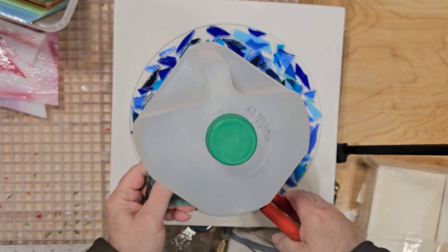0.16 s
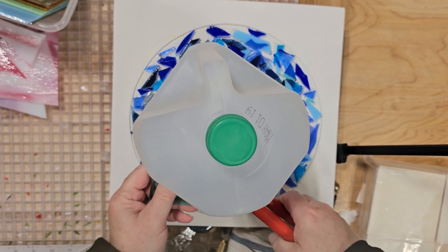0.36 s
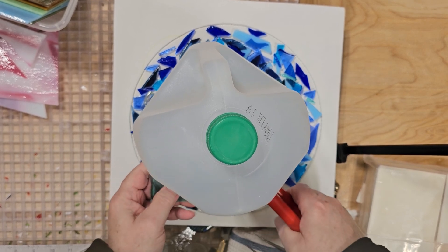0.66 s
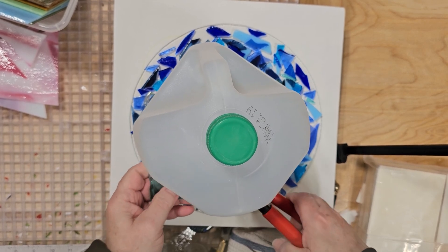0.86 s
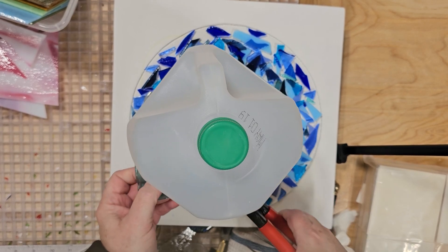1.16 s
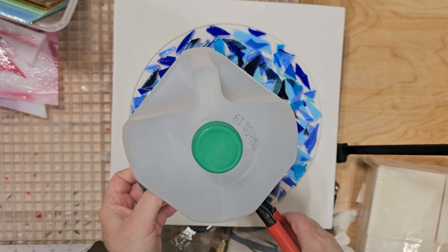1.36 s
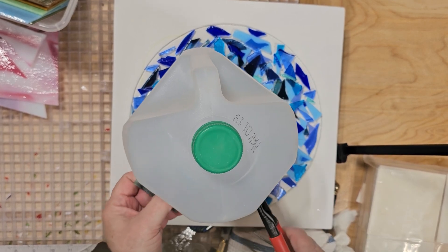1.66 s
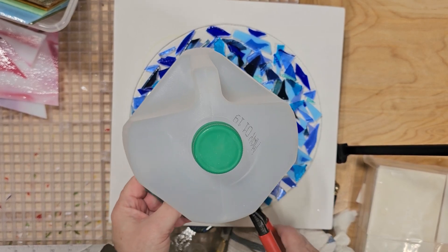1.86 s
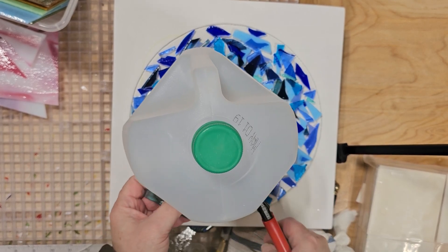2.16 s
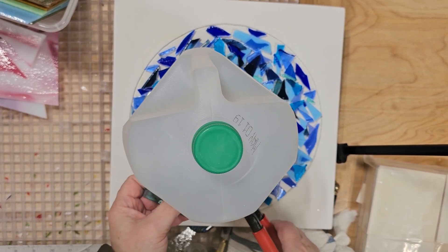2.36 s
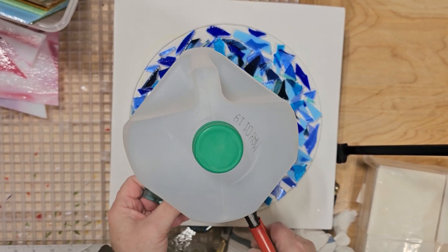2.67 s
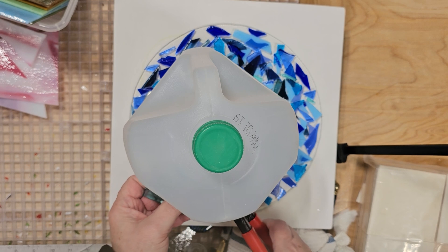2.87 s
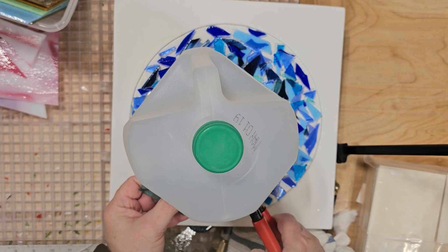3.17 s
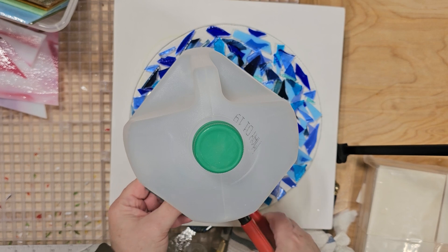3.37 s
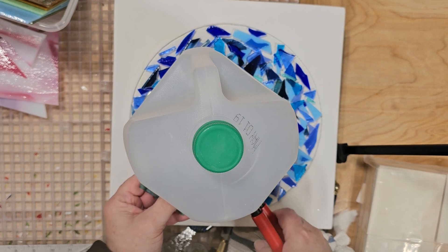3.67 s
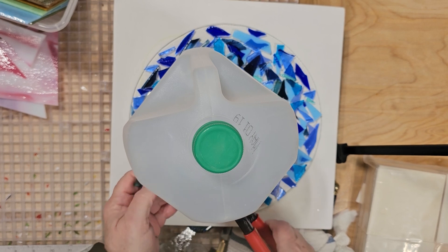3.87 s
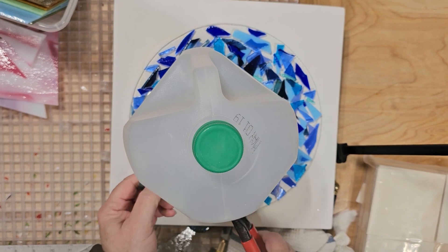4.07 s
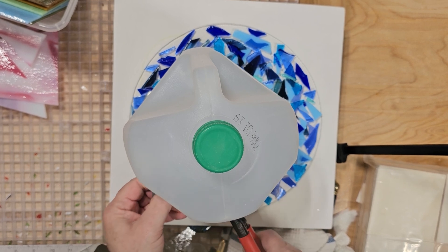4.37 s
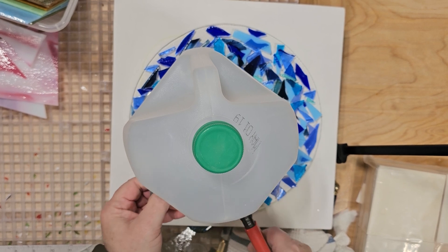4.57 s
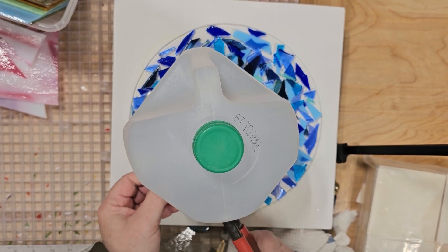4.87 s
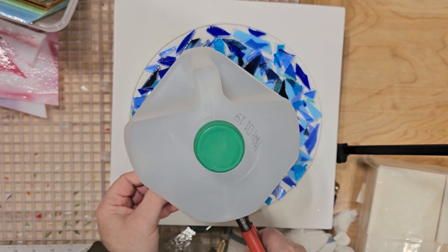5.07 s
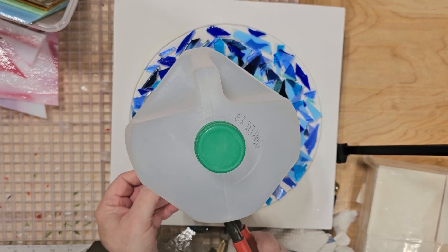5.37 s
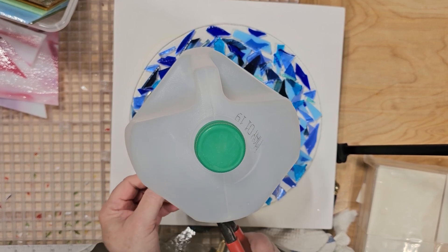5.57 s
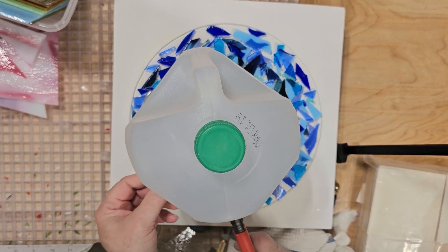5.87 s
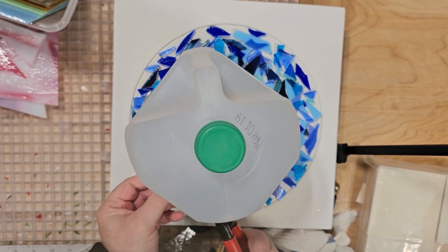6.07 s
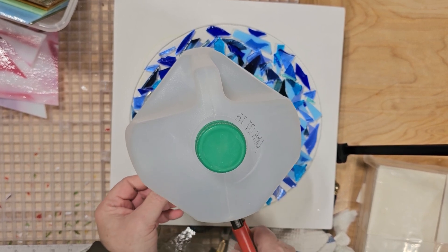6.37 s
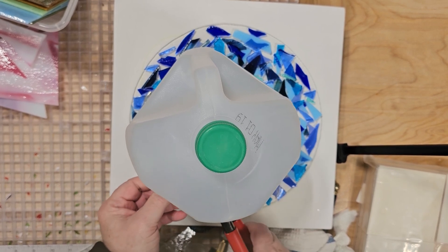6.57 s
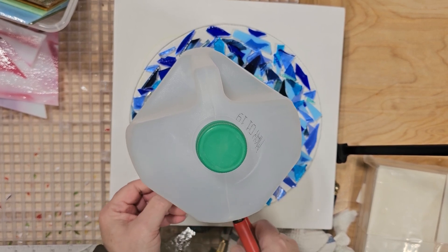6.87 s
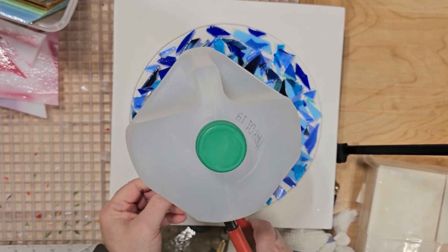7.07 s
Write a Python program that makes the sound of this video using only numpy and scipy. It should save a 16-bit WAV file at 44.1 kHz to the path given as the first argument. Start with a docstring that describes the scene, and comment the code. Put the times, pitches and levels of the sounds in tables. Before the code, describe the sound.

Close up in a small workroom, glass crackles and snaps between the jaws of hand nippers, over and over, a little under a second apart for most of the time. The cutting happens inside a plastic jug, so flying pieces tap its walls with hollow knocks and crumbs slide about between the crisp breaks. A faint hum lies underneath.

```python
"""Glass crunches and snaps between hand nippers, inside an upturned plastic jug on a workshop table.
Each brittle fracture radiates a noise burst and sets a shard ringing. Flying shards strike the jug and
bounce: the wall knocks in its bending modes and the enclosed air booms in its cavity modes.
A small room reverberates over a low hum, and a phone with two microphone ports picks it all up."""
import sys
import numpy as np
from scipy import signal
from scipy.fft import rfft, irfft, next_fast_len
from scipy.io import wavfile
from scipy.ndimage import uniform_filter1d

SR = 44100
rng = np.random.default_rng(int(sys.argv[2]) if len(sys.argv) > 2 else 0)


def pcm_store(signal):
    """Save signal as 16-bit PCM."""
    levels = np.round(np.clip(np.atleast_2d(signal), -1, 1) * 32767)
    wavfile.write(sys.argv[1], SR, levels.astype(np.int16).T)


N = 317961
SIZE = next_fast_len(N + SR)
HZ = np.maximum(np.arange(SIZE // 2 + 1) * SR / SIZE, 1)
TIME, SPAN = np.arange(N) / SR, np.arange(8192) / SR  # seconds: whole scene, one event

# Modes of the thin jug wall. Each row: frequency in Hz, relative level in dB, T60 in seconds.
WALL_MODES = [(738, -10, 0.018), (837, -14, 0.036), (1013, -4, 0.034), (1155, 0.5, 0.016),
              (1284.6, 2.5, 0.018), (1453, 0, 0.019), (1628, 2, 0.015), (1847, 1.5, 0.011),
              (2013, 0, 0.0097), (2140, -8, 0.033)]
# Upper modes of the air in the jug. Each row: frequency in Hz, relative level in dB, T60 in seconds.
HIGH_AIR_MODES = [(428, -13.5, 0.15), (534.8, 14.5, 0.07), (605, -11.5, .08), (631.7, 3, 0.086)]
# Spectrum of glass hitting plastic. Each row: frequency in Hz, relative density in dB.
CLICK_SPECTRUM = [(1350, -18.5), (2300, -4), (4620, -2), (5750, -7.5), (8160, -3), (10400, -16),
                  (11700, -16), (16000, -20)]


def glass_fracture():
    """Brittle fracture: stored strain energy escapes as a burst that excites shard, jaws and jug wall."""
    # Crunches as the jaws close. Each row: start in seconds, level in dB, shard pitch in Hz.
    cracks = [(0.4222, -20, 6430), (0.488, -19.5, 7100), (.492, -12, 7600), (0.5095, -14.5, 8500),
              (1.087, -39, 2900), (1.13, -38, 4640), (1.163, -25.5, 7430), (1.17, -23.5, 6630),
              (1.209, -25.5, 11600), (1.363, -35.5, 7600), (1.945, -35, 6860), (2.0425, -44, 4540),
              (2.058, -40, 7150), (2.1036, -22, 5630), (2.1168, -4, 9180), (2.4655, -19.5, 7580),
              (2.4803, -22.5, 8700), (2.5352, -11.5, 7700), (2.562, -22, 8420), (2.5684, -7.5, 8350),
              (2.573, -11, 7410), (2.5917, 2, 8700), (2.9762, -13, 11500), (2.994, -14.5, 2880),
              (3.0013, -11, 7500), (3.0267, -10.5, 8250), (3.4555, -20.5, 8000), (3.475, -19.5, 8450),
              (3.498, -38, 8800), (4.1891, -23, 4460), (4.253, -45, 7000), (4.358, -18, 11150),
              (4.3943, -29, 6630), (4.428, -27, 8500), (4.4565, -13, 8600), (4.914, -40.5, 6440),
              (4.9627, -25, 8300), (5.012, -31, 10300), (5.0399, -12.5, 8200), (5.052, -10.5, 3030),
              (5.65, -28, 5960), (5.674, -27.5, 4280), (5.713, -17.5, 10100), (6.1927, -18.5, 8400),
              (6.214, -20.5, 9500), (6.2269, -20, 8400), (6.2424, -19, 7200), (6.2657, -14, 4500),
              (6.2856, -40, 7900), (6.2967, -20, 7900), (6.763, -22.5, 7650), (6.788, -17, 7800),
              (6.801, -14.5, 7900), (6.816, -15, 7400), (6.8324, -37, 7950), (6.85, -6, 6280)]
    # The glass parts. Each row: start in seconds, level in dB, shard pitch in Hz,
    # length of the grinding before it in ms, grinding level in dB.
    snaps = [(0.521, 0.5, 8460, 35, -25), (2.1059, -1.5, 5500, 3, -29.5), (2.5923, -1.5, 8470, 35, -29),
             (3.0186, 0.5, 5990, 53, -33), (3.5185, 0.5, 6750, 33, -36.5), (4.4767, 0.5, 5780, 49, -20.5),
             (5.0542, -1, 8060, 50, -28), (5.7371, -2, 6540, 26, -21.5), (6.3042, -.5, 7720, 20, -32),
             (6.8521, -1, 8000, 83, -28)]
    # Spectrum of breaking glass. Each row: frequency in Hz, relative density in dB.
    spectrum = [(700, -40), (1700, -21.5), (2400, -14.5), (3000, -13), (4300, -11.5), (5700, -5),
                (8200, -1.5), (9400, -3.5), (10400, -14.5), (11700, -7.5), (16000, -12)]
    breaks = [(s, db, hz, 4.1) for s, db, hz in cracks]
    breaks += [(s, db, hz, 3.23) for s, db, hz, *_ in snaps]
    breaks += [(s + 0.0045, db - 3, 8330, 4.1) for s, db, *_ in snaps]  # the freed edge cracks again
    crackle, clink, clack = np.zeros((3, 2, N))
    for s, db, hz, decay_ms in breaks:
        burst = rattle(decay_ms, blow_db=-4)
        grit = amp(-14) * rattle(12.7, blow_db=-32.5)
        add(crackle, s, amp(db) * (burst + grit))
        jaw_gain = amp(rng.normal(-11, 3))
        steel_jaws = jaw_gain * ping(hz=rng.normal(2950, 200), t60=.008)
        add(clink, s, amp(db) * (ping(hz, t60=.013) + steel_jaws))
        add(clack, s, amp(-38.5 + 0.75 * db) * rattle(decay_ms))  # each crack also knocks the jug wall into a brief clack
    crackle += grinding(snaps)
    return (amp(-6) * colour(crackle, unit(amp(over_hz(spectrum))))
            + amp(-1.5) * colour(clink, low_cut(hz=2500)) + amp(4.5) * ring(clack, WALL_MODES))


def grinding(snaps):
    """Friction: the cutting wheels crush grit just before each snap."""
    spells = [(s - ms / 1000, s, db, db) for s, _, _, ms, db in snaps]
    opening_sizzle = (-4, 0.13, -23, -40)  # grit of an earlier snap dies away
    return colour(grains(spells + [opening_sizzle], lump_db=3.5, rate_hz=450), low_cut(hz=5000))


def ringing_shard():
    """Free vibration: a stiff shard rings on in one high, lightly damped mode."""
    # Each row: start in seconds, frequency in Hz, level in dB, T60 in seconds.
    notes = [(3.022, 15014, -13, .14), (3.327, 15014, -32, .1)]
    sound = np.zeros(N)
    for s, hz, db, t60 in notes:
        age = np.maximum(TIME - s, 0)
        envelope = (1 - np.exp(-age / 0.002)) * 1000. ** (-age / t60)
        sound += amp(db) * envelope * np.sin(2 * np.pi * hz * TIME)
    return sound


def jug_knocks(contact_ms=9):
    """Impact excitation: a shard clicks on the wall, which rings and drives the cavity modes."""
    # Each row: start in seconds, then levels in dB of click, wall, deep boom and high boom.
    knocks = [(0.0298, -19.5, -25, -24.5, -24), (0.1094, -43, -40, -45, -28.5),
              (0.191, -10, -14.5, -46, -45), (.2004, -13, -28, -39, -32), (0.2743, -18, -25.5, -43, -24),
              (0.3223, -22, -33.5, -58, -36.5), (.63, -12.5, -16.5, -16, -12), (.727, -12.5, -19, -19, -16),
              (.8135, -38, -36, -56, -27), (0.835, -23.5, -34, -40, -27.5), (.864, -18, -26.5, -46, -25),
              (.9453, -32.5, -35, -43, -35), (1.3393, -35, -60, -48.5, -30.5),
              (2.2222, -11, -19.5, -46, -30), (2.2384, -23, -31, -56, -54),
              (2.2732, -30, -32, -56.5, -51.5), (2.3287, -19, -30, -60, -43), (2.396, -31, -36, -58.5, -51),
              (2.408, -28.5, -34.5, -58, -45), (2.4403, -29.5, -36, -62.5, -47.5),
              (2.6836, -9, -14, -21, -10.5), (2.757, -14, -17, -21, -15), (2.807, -15, -18.5, -44, -20),
              (2.8836, -16.5, -20, -51, -25.5), (2.9271, -13, -24.5, -57, -27.5),
              (2.9598, -23, -30.5, -48, -31.5), (3.278, -14, -16.5, -27, -15.5),
              (3.328, -11, -29, -44, -29.5), (3.3939, -29, -42, -44, -59), (3.659, -53, -48, -62, -60),
              (3.702, -13, -18.5, -42, -22.5), (3.7576, -20.5, -32.5, -37, -29),
              (3.8392, -19, -29, -53, -34), (4.6359, -10, -14, -20.5, -19), (4.6974, -17, -27, -29.5, -29),
              (4.726, -36.5, -47, -45.5, -51), (4.776, -19.5, -34, -51, -30), (5.1226, -25, -26, -17, -18),
              (5.1861, -5, -14, -21.5, -24.5), (5.257, -25, -37, -33.5, -39),
              (5.2756, -20.5, -33, -61, -45), (5.3497, -22.5, -30.5, -49, -27.5),
              (5.3913, -26, -37, -48, -51), (5.439, -32.5, -43, -46, -46), (5.8487, -10, -21.5, -30.5, -22),
              (5.9978, -12.5, -18.5, -28.5, -32), (6.071, -25.5, -27.5, -59, -36.5),
              (6.0898, -19, -33, -53, -41), (6.117, -27, -32.5, -40, -37.5), (6.3714, -17.5, -39, -24, -30),
              (6.3904, -11.5, -19, -28, -13.5), (6.4676, -22, -26, -25.5, -33), (6.4777, -9, -19, -33, -21),
              (6.5463, -25, -46, -46, -51), (6.5684, -16.5, -27.5, -53, -26),
              (6.5798, -18, -30.5, -54, -39), (6.604, -27.5, -37, -56, -42.5), (6.7106, -26, -36, -52, -33),
              (6.9129, -11, -21, -19, -23), (6.9231, -10.5, -19, -34, -11), (7.026, -5, -15.5, -36, -28),
              (7.1153, -23, -28.5, -57, -24.5), (7.1434, -24, -36, -48, -50), (7.1872, -29, -37, -53, -50)]
    # Lower modes of the air in the jug. Each row: frequency in Hz, relative level in dB, T60 in seconds.
    deep_air_modes = [(162.5, -10, 0.18), (268, -5, 0.17), (275.8, 1, 0.29), (314.7, -2, 0.21),
                      (334, 0, 0.034)]
    click, jug = np.zeros((2, 2, N))
    for s, click_db, wall_db, deep_db, high_db in knocks:
        add(click, s, amp(click_db) * rattle(contact_ms))
        impact = rattle(1.85 * contact_ms, blow_db=17, correlation=.8)
        add(jug, s, amp(wall_db) * ring(impact, struck(WALL_MODES)))
        # the wall flexes once, then shudders, pushing the air inside
        flex = np.exp(-SPAN / 0.00013) * rng.choice([-1, 1])
        push = flex + amp(-12) * rattle(4.24 * contact_ms, blow_db=-27.5)[:1]
        add(jug, s, amp(deep_db) * ring(push, struck(deep_air_modes)))
        add(jug, s, amp(high_db) * ring(push, struck(HIGH_AIR_MODES)))
    return jug + amp(-3.5) * colour(click, unit(amp(over_hz(CLICK_SPECTRUM))))


def skitter(fade_db_per_s=48.5):
    """Random forcing: sliding crumbs and hands shifting the jug excite its wall and air."""
    # Each row: start in seconds, length in seconds, initial level in dB.
    slides = [(0.002, 0.21, -55), (0.185, 0.15, -34.5), (0.747, 0.25, -30.5), (1.009, .14, -50),
              (1.284, 0.097, -48.5), (2.247, 0.24, -43), (2.69, 0.26, -27), (3.289, 0.085, -28),
              (3.699, 0.18, -36.5), (4.647, 0.16, -31.5), (5.112, 0.31, -27.5), (5.863, 0.48, -51),
              (6.351, 0.4, -32.5), (6.91, 0.5, -40.5)]
    spells = [(s, s + length, db, db - fade_db_per_s * length) for s, length, db in slides]
    patter = grains(spells, lump_db=3, rate_hz=160)
    clicks = amp(-4) * colour(patter, unit(amp(over_hz(CLICK_SPECTRUM))))
    return clicks + amp(-4.5) * ring(patter, WALL_MODES) + amp(-14) * ring(patter[:1], HIGH_AIR_MODES)


def room(x, build_up_s=0.00043):
    """Reverberation: a diffuse field, different at each port, decays exponentially in each octave."""
    # Each row: frequency in Hz, T60 in seconds.
    decay_times = [(200, 0.17), (1000, 0.28), (4000, 0.3), (9000, 0.39), (16000, 0.08)]
    # Each row: frequency in Hz, relative reverberant level in dB.
    levels = [(200, -24.5), (1000, -12), (4000, -10), (9000, -16), (16000, -6)]
    t = np.arange(SR // 2) / SR
    tail = 0
    for hz in 180 * 2. ** np.arange(7):
        octave = signal.butter(2, [hz / np.sqrt(2), hz * np.sqrt(2)], "band", fs=SR, output="sos")
        band = signal.sosfilt(octave, rng.standard_normal((2, len(t))))
        t60 = over_hz(decay_times, hz)
        envelope = 1000. ** (-t / t60) * (1 - np.exp(-t / build_up_s))
        energy_norm = np.sqrt(np.log(1e6) / (t60 * SR))
        tail += band * envelope * energy_norm * amp(over_hz(levels, hz))
    return signal.fftconvolve(x[None], tail, axes=1)[:, :N]


def hum():
    """Spatial coherence: room tone is alike at both ports only in the bass; a deep rumble swells late."""
    # Each row: frequency in Hz, relative density in dB.
    spectrum = [(15, -40.5), (40, -20), (78, -0.5), (120, -14.5), (175, -14.5), (203, -8.5), (235, -14),
                (350, -23), (550, -20.5), (1200, -32.5), (2200, -36), (2900, -50.5), (3900, -42),
                (5200, -51), (7500, -45), (10000, -68), (16000, -89)]
    # Each row: frequency in Hz, correlation between the ports.
    coherence = [(60, .95), (290, .85), (640, .5), (1410, 0)]
    alike = over_hz(coherence)
    noise = rng.standard_normal((3, N))
    mid, side = colour(noise[:2], amp(over_hz(spectrum)) * np.sqrt([1 + alike, 1 - alike]))
    tone = unit(np.array([mid + side, mid - side])) * amp(-51.5 + walk(rate_hz=0.42))
    rumble = unit(colour(noise[2], bell_curve(hz=49, width_hz=39)))
    rumble_db = np.interp(TIME, [4.998, 6.2, 6.6, 7.21], [-63, -52, -43.5, -46.5])
    return tone + rumble * amp(rumble_db)


def rattle(decay_ms, blow_db=6, correlation=0.45):
    """Contact noise: a sharp blow, then tiny dying slips, partly correlated between the ports."""
    near, other = rng.standard_normal((2, len(SPAN)))
    far = correlation * near + np.sqrt(1 - correlation ** 2) * other
    lumps = amp(-2 * np.repeat(rng.standard_normal(len(SPAN) // 64), 64))
    fade = np.exp(-(SPAN * 1000 / decay_ms) ** 1.5)
    blow = amp(blow_db) * np.exp(-SPAN * 1000 / 0.091)
    sound = np.array([near, far]) * (lumps * fade + blow)
    return sound * np.linalg.norm(fade) / np.linalg.norm(sound[0])


def grains(spells, lump_db, rate_hz):
    """Granular noise: countless tiny contacts merge into a lumpy hiss during each spell."""
    level = sum((TIME > start) * (TIME < end) * amp(np.interp(TIME, [start, end], [first_db, last_db]))
                for start, end, first_db, last_db in spells)
    return uniform_filter1d(level, size=60) * amp(lump_db * walk(rate_hz)) * rng.standard_normal((2, N))


def struck(modes):
    """Modal scatter: strike point and grip shift each mode's pitch and strength at random."""
    return [(hz * rng.normal(1, .015), rng.normal(db, 2.5), t60) for hz, db, t60 in modes]


def ring(x, modes):
    """Modal superposition: x drives damped resonators whose joint response has unit energy."""
    response = sum((-1) ** k * amp(db) * ping(hz, max(t60, .01)) for k, (hz, db, t60) in enumerate(modes))
    return signal.fftconvolve(x, response[None] / np.linalg.norm(response), axes=1)[:, :x.shape[1]]


def ping(hz, t60):
    """Damped oscillation: one mode falls 60 dB in t60 seconds."""
    return np.sin(2 * np.pi * hz * SPAN) * np.exp(-np.log(1000) * SPAN / t60)


def walk(rate_hz):
    """Smoothed random fluctuation with RMS 1."""
    hold = int(SR / rate_hz)
    steps = np.repeat(rng.standard_normal(N // hold + 1), hold)
    return unit(uniform_filter1d(uniform_filter1d(steps, hold), hold)[:N])


def add(track, s, sound):
    """Superpose a short sound at s seconds."""
    at = int(s * SR)
    track[..., at:at + len(SPAN)] += sound[..., :N - at]


def amp(db):
    """Decibels to amplitude."""
    return 10 ** (np.asarray(db, float) / 20)


def unit(x):
    """Normalise to RMS 1."""
    return x / np.sqrt(np.mean(x ** 2))


def over_hz(table, hz=HZ):
    """Interpolate on a log-frequency axis."""
    freqs, values = np.transpose(table)
    return np.interp(np.log(hz), np.log(freqs), values)


def colour(x, gain):
    """Linear filtering: one gain per frequency."""
    return irfft(rfft(x, SIZE) * gain, SIZE)[..., :N]


def low_cut(hz):
    """Gain falling 12 dB per octave below hz."""
    return np.minimum(HZ / hz, 1) ** 2


def bell_curve(hz, width_hz):
    """Gaussian band around hz."""
    return np.exp(-((HZ - hz) / width_hz) ** 2)


def scene():
    """Acoustic shadow: the near port faces the jug, and the phone's body screens the far one."""
    # Each row: frequency in Hz, phase lag of the far port in radians.
    phase_lag = [(0, 0), (300, .3), (700, .7), (1550, 1.8), (3010, 1.2), (4500, 3.2), (6800, -.5),
                 (8180, 2.4), (9560, 10.1), (16500, 14)]
    # Each row: frequency in Hz, attenuation of the far port in dB.
    shadow = [(60, 0), (110, 12.5), (200, -3), (380, 5), (700, -1), (1290, 5), (2380, 8.5), (4400, 10.5),
              (8120, 17.5), (15000, 10)]
    near, far = glass_fracture() + ringing_shard() + jug_knocks() + skitter()
    lag = np.interp(HZ, *np.transpose(phase_lag))
    far = colour(far, np.exp(-1j * lag))
    left, right = np.array([near, far]) + room(near)
    return np.array([left, colour(right, amp(-over_hz(shadow)))]) + hum()


def record(dry):
    """Transducer response: the ports dip near 10 kHz, the loudest snaps saturate and the top is cut."""
    notched = colour(dry, amp(-9.5 * bell_curve(hz=10340, width_hz=210)))
    low_pass = signal.ellip(10, .2, 70, 15900, fs=SR, output="sos")
    return .86 * signal.sosfilt(low_pass, np.tanh(1.1 * notched))


dry = scene()
out = record(dry)
pcm_store(out)
```